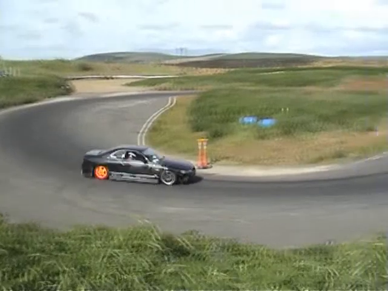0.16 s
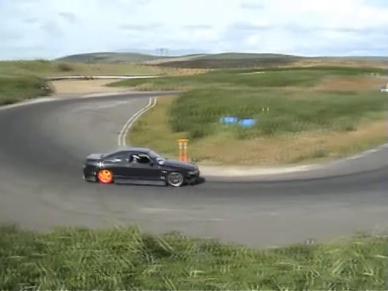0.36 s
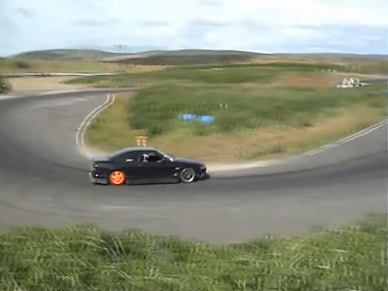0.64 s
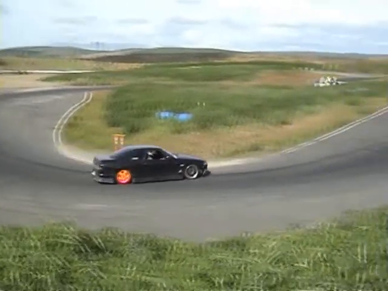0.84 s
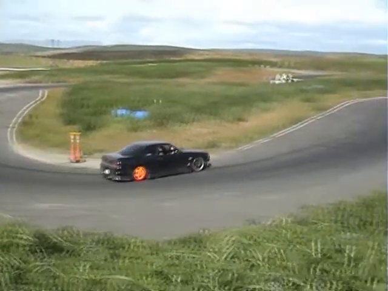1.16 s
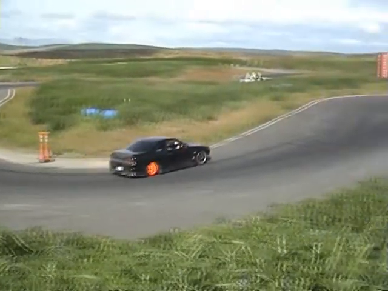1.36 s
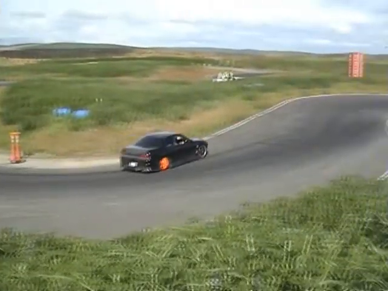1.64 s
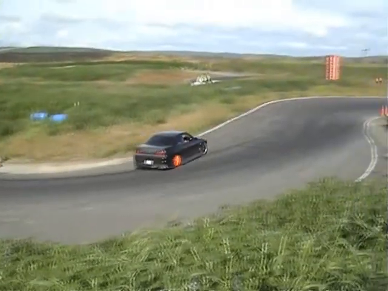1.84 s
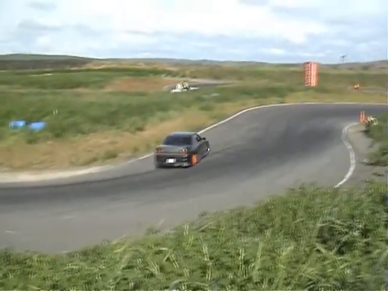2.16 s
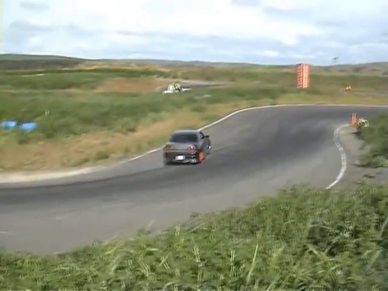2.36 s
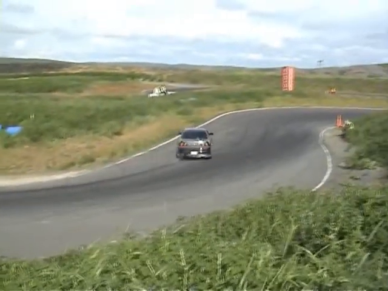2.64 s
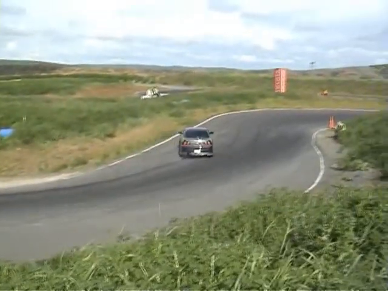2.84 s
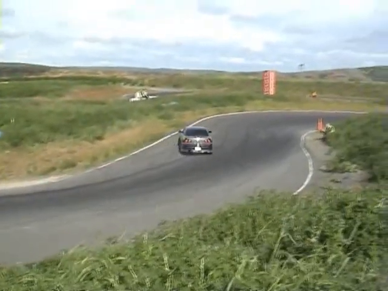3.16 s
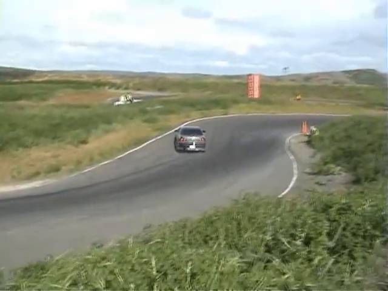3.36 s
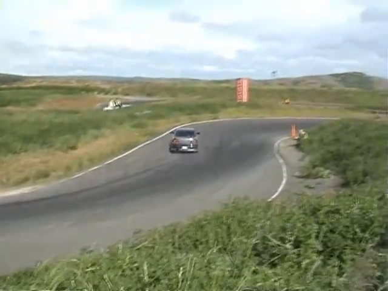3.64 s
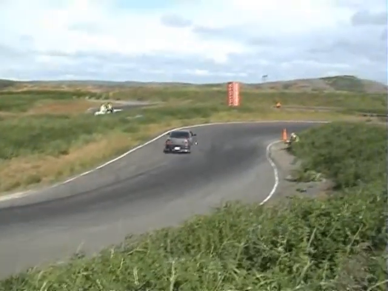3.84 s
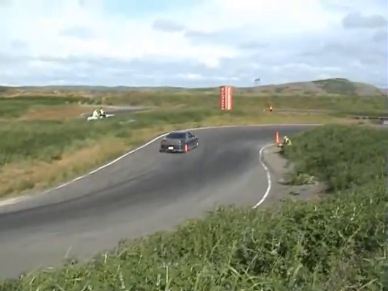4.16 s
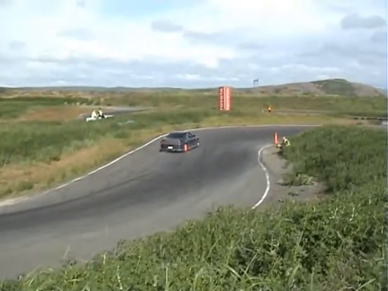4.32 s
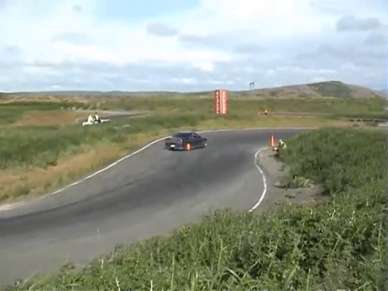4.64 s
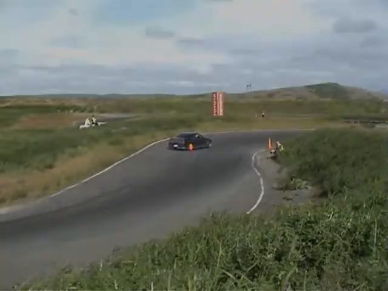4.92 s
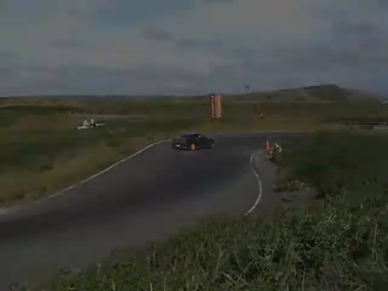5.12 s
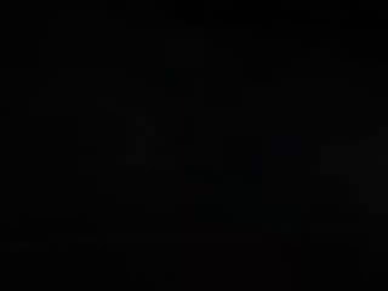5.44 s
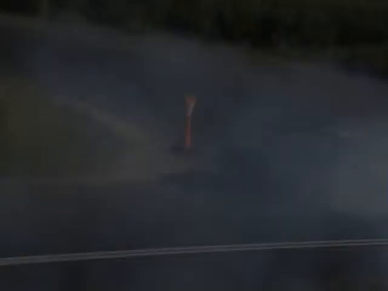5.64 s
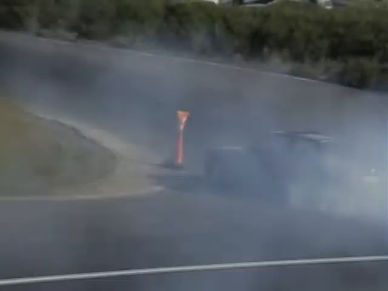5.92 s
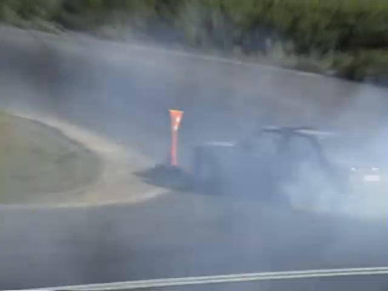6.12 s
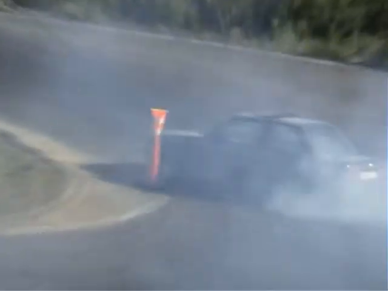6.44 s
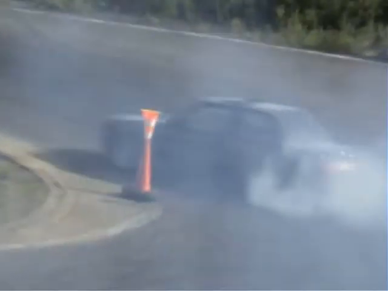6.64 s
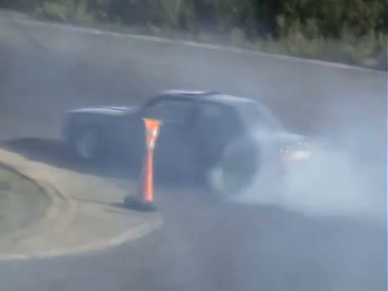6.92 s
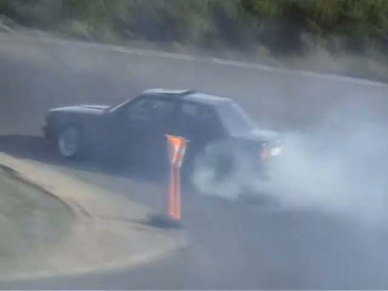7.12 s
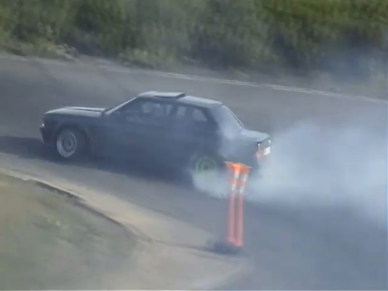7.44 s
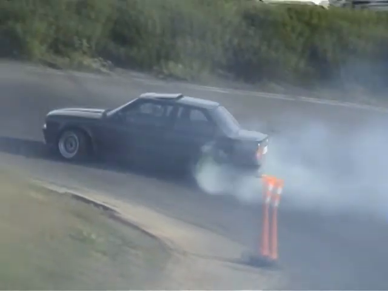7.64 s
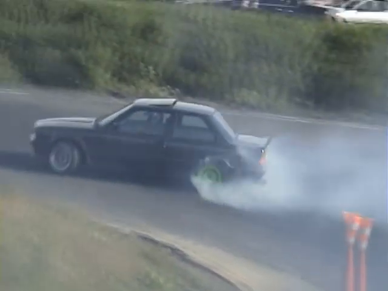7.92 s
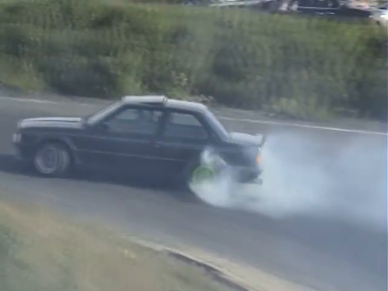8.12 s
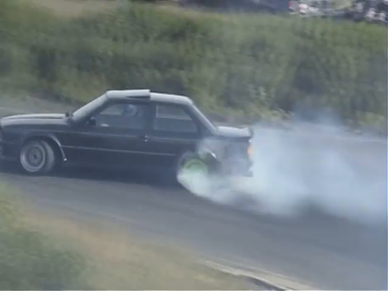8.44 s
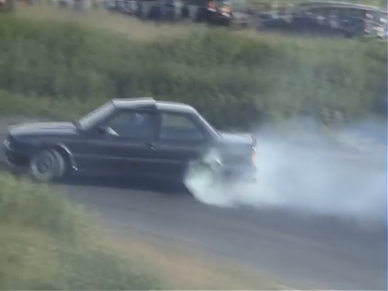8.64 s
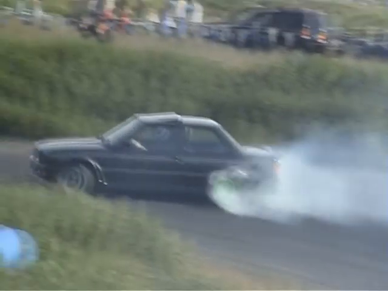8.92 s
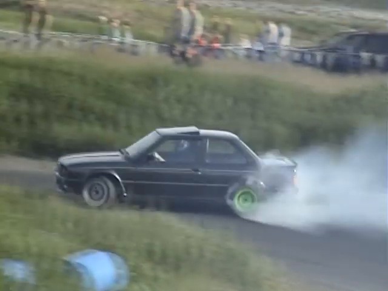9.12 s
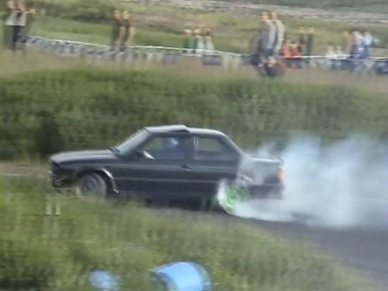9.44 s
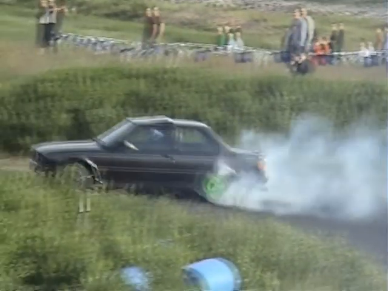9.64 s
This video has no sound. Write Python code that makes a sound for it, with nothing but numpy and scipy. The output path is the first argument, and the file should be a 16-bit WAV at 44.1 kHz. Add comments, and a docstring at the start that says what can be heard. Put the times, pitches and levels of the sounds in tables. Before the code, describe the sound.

Outdoors by a track bend, a six-cylinder engine climbs in revs under loud, wavering tyre squeal and gusty microphone wind. The driver lifts off; the engine drops and burbles, squeal dies and two short chirps follow. The sound fades and cuts to silence, then a second car fades in at nearly steady high revs with two overlapping squeals, briefly dropping out once.

```python
"""Two cars drift round bends of an open track, one after the other, heard from the grass bank.
First a six-cylinder engine, built from pitched orders, burble and rasp, climbs in revs as its tyres squeal by
sticking and slipping. It lifts off and burbles, with two short tyre chirps, then fades and breaks off to silence.
The second car fades in with nearly steady revs and two squeals. Throughout, shaped noise makes road sound and
wind; a limiter holds loud peaks, there is one tick, and the sound breaks off now and then."""
import sys
import numpy as np
from scipy import signal
from scipy.fft import rfft, irfft, next_fast_len
from scipy.io import wavfile
from scipy.ndimage import uniform_filter1d, minimum_filter1d

SR = 44100
rng = np.random.default_rng(int(sys.argv[2]) if len(sys.argv) > 2 else 0)


def dump_mix(stems):
    """Bounce the given channels to the path in sys.argv[1] as a 16-bit WAV at rate SR."""
    frames = np.atleast_2d(stems).T  # one column per channel
    limited = np.clip(frames, -1, 1)  # hard clip at full scale
    pcm = np.round(limited * 32767).astype(np.int16)
    wavfile.write(sys.argv[1], SR, pcm)


def field_ratio(decibels):
    """Amplitude ratio for a level in dB (20 dB per decade); scalars and array-likes work."""
    return 10 ** (np.asarray(decibels, dtype=float) / 20)


N = 430857

# Wind and road noise spectra, each set to unit loudness before use: [f/Hz, level/dB per Hz]
WIND_SPECTRUM = [(20, -11.5), (45, -12), (80, -2), (130, -11), (250, -44)]
RUMBLE_SPECTRUM = [(55, -30), (85, -6), (130, 0), (200, -5), (300, -9), (450, -16), (700, -35)]
SCRUB_SPECTRUM = [(150, -23.5), (300, -5.5), (450, -2), (700, 2), (1050, 3.5), (1450, -4.5), (2000, -1.5),
                  (2600, -26.5), (4000, -53.5)]
HISS_SPECTRUM = [(1350, -29.5), (2300, -1), (2830, 0), (3330, -5.5), (4010, -7), (5270, -17.5),
                 (8340, -20.5), (10600, -27.5), (13500, -44)]
# How alike left and right are, 1 for the same and -1 for opposed: [f/Hz, likeness]
STEREO_LIKENESS = [(130, 0.21), (500, 0.84), (2500, 0.91), (4500, .8), (12000, 0.91)]
# Low swells of wind and rumble: [peak t/s, half length/s, added wind level/dB, added rumble level/dB]
LOW_SWELLS = [(0.024, 0.16, 9, 14), (0.226, 0.27, 18, 13.5), (1.23, .12, 8, -4), (2.376, 0.17, 18, 16),
              (2.656, 0.3, 19.5, 20.5), (2.871, 0.17, 11.5, 11), (3.29, .1, 8.5, 15.5), (3.979, .12, 18, 1),
              (7.24, .2, -1, 4), (9.3, 0.22, -1, 4), (9.78, 0.086, 16.5, 6)]
# Rolling and sliding tread: [t/s, scrub level/dB, hiss level/dB]
TREAD_LEVELS = [(0, -30.5, -45), (.45, -31, -44), (1.1, -27, -37), (1.55, -26.5, -40), (2.0, -23, -36),
                (2.5, -21, -38), (2.95, -29, -40), (3.25, -28, -39), (3.85, -32, -46), (4.0, -40, -52.5),
                (4.85, -37, -54), (5.64, -31, -43), (6.1, -30, -42), (6.6, -31, -44), (7.2, -27, -42.5),
                (7.8, -30, -48), (8.45, -31, -47), (8.8, -31, -45), (9.25, -35.5, -52), (9.77, -39, -51)]
WIND_DB, RUMBLE_DB = -61, -51  # between swells

# Engine runs: [t/s, firing rate f/Hz, order 1 level/dB, upper orders level/dB, cylinder unevenness level/dB]
FIRST_CLIMB = [(0, 169, -17, -24, -28.5), (.19, 188, -17, -24, -38.5), (.54, 207, -16, -24, -34),
               (.77, 221, -21, -25, -25.5), (1.05, 247, -22.5, -24, -22), (1.35, 228, -19.5, -22, -25),
               (1.73, 255.5, -21.5, -22, -22), (2.12, 276.9, -19.5, -19, -21.5),
               (2.31, 292, -17.5, -19, -26), (2.53, 300, -23.5, -18, -23)]
FIRST_LIFT_OFF = [(2.63, 281, -28, -33, -25), (2.7, 277, -29, -29, -23), (2.77, 253, -27, -33, -25),
                  (2.95, 245, -33, -28, -23), (3.13, 234, -30, -28, -25), (3.27, 237, -32, -27, -24),
                  (3.58, 229, -31, -24, -24), (3.77, 222, -30, -29, -25), (3.95, 222.3, -20.5, -24, -18.5),
                  (4.27, 215.2, -24, -27, -19), (4.45, 205, -25, -29, -20.5),
                  (4.54, 195.7, -27, -27, -21.5), (4.85, 196.5, -32.5, -29, -21)]
SECOND_HOLD = [(5.62, 158.7, -21, -27.5, -39), (6.0, 165.2, -18.5, -23.5, -47),
               (6.14, 171.6, -21, -24.5, -48.5), (6.38, 165, -20.5, -25, -39),
               (6.63, 169.5, -21.5, -24, -51), (6.88, 167.8, -21.5, -23.5, -53), (7.13, 166, -27, -21, -45),
               (7.63, 168.7, -21, -20, -45), (8.13, 168.5, -17.5, -21.5, -36),
               (8.63, 178.5, -17.5, -21, -43), (8.95, 182.5, -16, -22.5, -46),
               (9.13, 176.3, -22.5, -28.5, -32), (9.36, 170.2, -27.5, -31, -30),
               (9.46, 170.1, -18.5, -23.5, -34), (9.77, 177.4, -16, -24, -57)]
# Multiples of the firing rate: [order, level/dB against the upper orders level]
FIRST_UPPER_ORDERS = [(2, 6), (3, 2.5), (4, -11), (5, -6.5)]
SECOND_UPPER_ORDERS = [(2, -2), (3, 0), (4, -1), (5, -9), (6, -6), (7, -9), (8, -14), (9, -16), (10, -15),
                       (11, -17), (12, -16), (13, -19), (14, -21), (15, -23), (16, -24), (17, -26),
                       (18, -28)]
# Exhaust pipe resonances that colour the burble: [f/Hz, width/Hz, level/dB]
PIPE_RESONANCES = [(140, 90, -14), (360, 80, -10), (480, 60, -7), (600, 110, 0), (750, 110, 1),
                   (1300, 500, -17)]
# Colour of the first car's upper orders: [f/Hz, level/dB]
TAILPIPE_COLOUR = [(330, -14.5), (420, -11.5), (490, -7), (570, -1.5), (620, -2.5), (680, -6), (780, -8),
                   (900, -7.5)]
# Brief dips of the first car's drone: [t/s, half length/s, level/dB]
DRONE_DIPS = [(.576, .022, -24), (.93, .015, -10), (1.325, .015, -12), (2.61, .015, -12), (2.95, .02, -14),
              (3.045, .012, -16), (3.345, .016, -20), (3.555, .012, -14), (3.78, .015, -10)]

# Tyre squeals before each one's trim: [t/s, slip rate f/Hz, partial 1 level/dB, partial 2 level/dB, ..]
FIRST_CAR_SQUEAL = [(0.0, 997, -22, -35.5, -49.5), (0.04, 960, -17.5, -24, -43),
                    (0.07, 1041, -14, -23, -39.5), (0.23, 1062, -18.5, -32, -56),
                    (0.36, 950, -11, -15, -51), (0.42, 1000, -14, -35.5, -38.5),
                    (0.57, 918, -13, -25.5, -48.5), (0.6, 991, -9.5, -23, -34.5),
                    (0.87, 950, -16.5, -21.5, -34), (0.96, 1018, -15, -17.5, -40),
                    (1.13, 1005, -8.5, -23, -26.5), (1.23, 1035, -11, -18.5, -26),
                    (1.28, 984, -7.5, -18, -36), (1.4, 1025, -12.5, -26, -37.5),
                    (1.5, 900.5, -13.5, -17, -24), (1.65, 975, -10.5, -22, -37),
                    (1.78, 929, -8.5, -21.5, -27.5), (1.91, 979, -15.5, -22.5, -29.5),
                    (2.03, 889, -19.5, -15, -24.5), (2.16, 967, -10.5, -25, -28.5),
                    (2.37, 941.4, -9, -21.5, -22.5), (2.48, 892, -17.5, -31, -39),
                    (2.58, 902, -14.5, -19, -22.5), (2.65, 973, -14.5, -32.5, -58),
                    (2.69, 912, -13.5, -26.5, -31), (2.95, 963, -17, -18.5, -18.5),
                    (3.06, 913, -16, -14.5, -20.5), (3.25, 945.8, -21.5, -18.5, -18),
                    (3.33, 913, -16, -19.5, -21), (3.7, 970, -24.5, -12, -22.5),
                    (3.83, 1046, -19.5, -23.5, -25.5), (3.97, 993, -30.5, -31, -39)]
SECOND_CAR_SQUEAL = [(5.64, 966.4, -36, -18.5), (6.0, 978.7, -11.5, -25), (6.2, 1005, -16, -25),
                     (6.4, 993, -19.5, -12), (6.7, 974, -16.5, -18.5), (7.17, 938.6, -28, -29.5),
                     (7.34, 996, -23, -21.5), (8.23, 1018, -20.5, -23.5), (8.42, 1031, -19.5, -41),
                     (8.64, 1028, -32, -48), (8.85, 1055, -24.5, -27), (9.45, 1030, -25, -27.5),
                     (9.77, 1046, -36, -35.5)]
SECOND_CAR_HIGHER_SQUEAL = [(5.64, 1220, -17, -27), (6.03, 1200, -19.5, -28), (6.3, 1190, -8.5, -31),
                            (6.4, 1190, -21.5, -22), (6.75, 1195, -19, -29), (6.96, 1205, -15, -22),
                            (7.08, 1215, -25, -16.5), (7.4, 1240, -19.5, -27.5), (7.9, 1200, -24.5, -35),
                            (8.33, 1210, -24, -45), (9.62, 1228, -35, -60), (9.77, 1230, -26.5, -49)]
# Pitch spread between the first car's tread patches: [t/s, spread/share of the pitch]
PATCH_SPREAD = [(0, .015), (.45, .03), (.7, .08), (2.1, .09), (2.6, .06), (2.85, .01), (3.97, .008)]
# Short tyre chirps: [start t/s, length/s, f/Hz, level/dB]
TYRE_CHIRPS = [(4.499, .1, 1400, -21.5), (4.714, .13, 1220, -22.5)]

# Breaks in the sound: [from t/s, to t/s, level left/dB]
SOUND_BREAKS = [(4.852, 5.626, -200), (6.212, 6.305, -200), (6.383, 6.3865, -20), (6.402, 6.406, -20)]


def rms_one(x):
    """Scales a signal to an rms (average loudness) of 1."""
    return x / np.sqrt(np.mean(np.abs(x) ** 2) + 1e-20)


def in_time(rows):
    """Joins table points with straight lines, giving each column one value a sample."""
    s, *columns = np.transpose(rows)
    return [np.interp(np.arange(N) / SR, s, column) for column in columns]


def sounding(rows, edge_s=0.01):
    """Gate that is open while the table lasts, with short ramps at its ends."""
    start, end = rows[0][0], rows[-1][0]
    return np.interp(np.arange(N) / SR, [start - edge_s, start, end, end + edge_s], [0, 1, 1, 0])


def swell(peak_s, half_s):
    """Triangle that rises to 1 and falls again."""
    return np.interp(np.arange(N) / SR, [peak_s - half_s, peak_s, peak_s + half_s], [0, 1, 0])


def drift(rate_hz):
    """Smooth chance wander of spread 1: noise through two equal low-pass stages."""
    r = np.exp(-40 * np.pi * rate_hz / SR)  # runs at every 20th sample
    noise = rng.standard_normal(N // 20 + 2002)
    slow = signal.lfilter([1], [1, -2 * r, r * r], noise)[2000:]  # skip the filter's start
    return np.interp(np.arange(N) / 20, np.arange(len(slow)), rms_one(slow))


def steps(per_s):
    """Chance values of spread about 1, each held for an uneven while, with softened jumps."""
    held = np.cumsum(rng.random(N) < per_s / SR)
    return uniform_filter1d(rng.standard_normal(N // 100)[held], size=200)


def at_hz(points, hz):
    """Reads a spectrum on a log-frequency axis."""
    point_hz, values = np.array(points)[:, 0], np.array(points)[:, 1]
    return np.interp(np.log(np.maximum(hz, 1)), np.log(point_hz), values)


def resonance(x, hz, width_hz):
    """Rings at one pitch, as a pipe does: a two-pole filter with gain 1 at its top."""
    r = np.exp(-np.pi * width_hz / SR)
    ringing = [1, -2 * r * np.cos(2 * np.pi * hz / SR), r * r]
    return signal.lfilter([(1 - r * r) / 2, 0, (r * r - 1) / 2], ringing, x)


def coloured(spectrum, low_hz, high_hz, likeness=STEREO_LIKENESS):
    """Stereo noise of a given spectrum and likeness, with rms 1 between low and high."""
    size = next_fast_len(N)
    hz = np.arange(size // 2 + 1) * SR / size
    shape = field_ratio(at_hz(spectrum, hz)) * (hz > 10) * (hz < 14000)
    mid, side = rfft(rng.standard_normal((2, size))) * shape
    alike = np.clip(at_hz(likeness, hz), -1, 1)
    # the side noise enters left and right with opposite signs
    pair = np.sqrt(1 + alike) * mid + np.sqrt(1 - alike) * side * np.array([[1], [-1]])
    band = (hz > low_hz) & (hz < high_hz)
    power = 2 * np.sum(np.abs(pair[0, band]) ** 2) / size ** 2
    return irfft(pair, size)[:, :N] / np.sqrt(power)


def balance(left_db):
    """Left and right gains that differ by left_db; a negative value leans to the right."""
    return field_ratio(np.array([[left_db / 2], [-left_db / 2]]))


def wind():
    """Light wind on the microphone ports: lumpy low noise, opposed in the two channels."""
    gust_db = WIND_DB + sum(db * swell(s, half) for s, half, db, _ in LOW_SWELLS)
    noise = coloured(WIND_SPECTRUM, 25, 94, likeness=[(30, -1.9), (200, -0.6)])
    return field_ratio(gust_db + 4 * drift(5)) * noise


def road_noise():
    """Low rumble, tread scrubbing on tarmac and fine hiss, each flickering in level."""
    scrub_db, hiss_db = in_time(TREAD_LEVELS)
    rumble_db = RUMBLE_DB + sum(db * swell(s, half) for s, half, _, db in LOW_SWELLS)
    shared = drift(4.0)  # scrub and hiss wander together
    rumble = field_ratio(rumble_db + 4 * drift(5)) * coloured(RUMBLE_SPECTRUM, 80, 140)
    scrub = field_ratio(scrub_db + 1.6 * shared + 1.523 * drift(100)) * coloured(SCRUB_SPECTRUM, 1197, 1786)
    hiss = field_ratio(hiss_db + 1.9 * shared + 1.4 * drift(90)) * coloured(HISS_SPECTRUM, 4560, 11000)
    return rumble + scrub + hiss


def ground_echo(x):
    """A bounce off bank and tarmac reaches the two sides at different times."""
    lags = (np.array([.0071, .0113]) * SR).astype(int)  # left and right delay in s
    return np.array([np.concatenate([np.zeros(lag), x[:-lag]]) for lag in lags])


def exhaust_burble(firings):
    """Unequal cylinders make a pressure pattern that repeats every six firings and rings in the pipe."""
    # lines lie at every sixth of the firing rate; higher ones come later, so each cycle chirps up
    delay_phase = rng.normal(0, .5, 60) - .07 * np.pi * np.arange(60) ** 2
    lines = field_ratio(rng.normal(0, 2.5, 60)) * np.exp(1j * delay_phase)
    pattern = np.interp(firings / 6 % 1, np.linspace(0, 1, 2048), irfft(lines, 2048))
    burble = sum(field_ratio(db) * resonance(resonance(pattern, hz, width), hz, width * 2)
                 for hz, width, db in PIPE_RESONANCES)
    return rms_one(burble)


def exhaust_rasp(firings):
    """Gas jets out after each firing: bursts of noise that die away, softened by two resonances."""
    puffs = rng.standard_normal(N) * np.exp(-8 * (firings % 1))
    return rms_one(resonance(resonance(puffs, 2200, 1500), 1800, 3000))


def engine(rows, upper, rasp_db, half_db, burble_db, colour=((1, 0), (2, 0)), unsteady=.003, flutter_db=1.5):
    """Even firings give clean orders that form a saw-like pulse; burble and rasp are added."""
    hz, first_db, upper_db, uneven_db = in_time(rows)
    firings = np.cumsum(hz * (1 + unsteady * drift(25))) / SR
    orders = [(1, first_db), (1.5, uneven_db + half_db)]
    orders += [(k, upper_db + db + at_hz(colour, k * hz)) for k, db in upper]
    flutters = [field_ratio(flutter_db * drift(34)) for _ in range(4)]  # shared out among the orders
    tones = 0
    for i, (k, db) in enumerate(orders):
        lead = 1.1 * (k > 1)  # radians; makes a sharp suck before each pulse
        tones = tones + field_ratio(db) * flutters[i % 4] * np.sin(2 * np.pi * k * firings - lead)
    burble = field_ratio(uneven_db + burble_db) * exhaust_burble(firings)
    rasp = field_ratio(upper_db + rasp_db) * exhaust_rasp(firings)
    return sounding(rows) * (np.sqrt(2) * tones + burble + rasp)


def chirps(attack_s=.015, sag_db=-6, faint_db=-30):
    """Each tyre chirp bites at once, sags and lets go; it is nearly a pure tone."""
    rows = []
    for s, length, hz, db in TYRE_CHIRPS:
        end = s + length
        points = ((s - attack_s, db - 27.5), (s, db), (end, db + sag_db), (end + attack_s * 2, db - 28))
        rows += [(t, hz, level, level + faint_db) for t, level in points]
    return squeal(rows, [], split=.008, wobble=.005, rough=.2, throb_db=1.5, flicker_db=0, trim_db=0)


def squeal(rows, upper_db, split, wobble, rough, throb_db, flicker_db, trim_db):
    """Rubber sticks and slips: one patch sings the pitch, two more jump about it; irregular grip blurs them."""
    hz, *levels = in_time(rows)
    all_levels = levels + [levels[-1] + db for db in upper_db]
    gains = [field_ratio(db + flicker_db * drift(9)) for db in all_levels]
    patches = (0, 0), (split * steps(22), -5.5), (split * steps(30), -8)  # pitch offset as a share, dB
    out = 0
    for offset, patch_db in patches:
        turns = np.cumsum(hz * (1 + offset + wobble * (drift(50.1) + steps(30)))) / SR
        grip = np.sqrt(1 - rough) + np.sqrt(rough / 2) * (drift(150) + 1j * drift(100))
        slips = np.exp(2j * np.pi * turns)
        partials = 0
        for gain in gains[::-1]:  # partial k turns k times as fast
            partials = (partials + gain) * slips
        throb = field_ratio(trim_db + patch_db + throb_db * drift(9.2))
        out = out + throb * np.real(grip * partials)
    return sounding(rows) * out


def scene():
    """Engines in the centre, tyres and road noise a little to the right, with wind and a ground echo."""
    first = engine(FIRST_CLIMB, FIRST_UPPER_ORDERS, rasp_db=-21, half_db=-10.5, burble_db=1.5,
                   colour=TAILPIPE_COLOUR)
    first += engine(FIRST_LIFT_OFF, FIRST_UPPER_ORDERS, rasp_db=-33, half_db=-18, burble_db=-1,
                    colour=TAILPIPE_COLOUR, unsteady=0.0023)
    second = engine(SECOND_HOLD, SECOND_UPPER_ORDERS, rasp_db=-18.5, half_db=1.5, burble_db=-11.5,
                    unsteady=.002)
    dips = field_ratio(sum(db * swell(s, half) for s, half, db in DRONE_DIPS))
    engines = first * dips + second

    tyres = squeal(FIRST_CAR_SQUEAL, [-19], in_time(PATCH_SPREAD)[0], wobble=.009, rough=.13,
                   throb_db=1.5, flicker_db=2, trim_db=3)
    tyres += chirps()
    tyres += squeal(SECOND_CAR_SQUEAL, [-15], split=.03, wobble=.006, rough=.15,
                    throb_db=2.5, flicker_db=1.5, trim_db=-4)
    tyres += squeal(SECOND_CAR_HIGHER_SQUEAL, [-16], split=.03, wobble=.009, rough=.2,
                    throb_db=3, flicker_db=2.5, trim_db=-4)

    road = road_noise() * dips ** .3 * balance(-1.5)  # dips less deeply than the drone
    echo = field_ratio(-24.5) * ground_echo(engines + tyres)
    return engines + tyres * balance(-2) + road + echo + wind()


def limiter(x, limit=1.05):
    """Gain control looks 3 ms ahead and eases the loudest moments down towards the limit."""
    needed = np.minimum(1, limit / (np.abs(x).max(axis=0) + 1e-9))
    return x * uniform_filter1d(minimum_filter1d(needed, size=260), size=300)


def band_limit(x):
    """A steep low-pass at the top of the band."""
    return signal.sosfilt(signal.butter(12, 15750, fs=SR, output="sos"), x)


def record(dry):
    """Dulls the top, limits peaks, adds one tick, fades out and in, and breaks the sound off abruptly."""
    dull = signal.sosfilt(signal.butter(2, 11000, fs=SR, output="sos"), dry)
    out = np.clip(limiter(dull), -1, 1)  # what the limiter lets through overloads slightly
    out[:, round(1.3285 * SR)] += field_ratio(-8)  # the tick is a single sample
    fade_out_s, silent_s, fade_in_s = 4.38, 5.496, 7.07  # slide starts, reaches nothing, is back in full
    out *= np.interp(np.arange(N) / SR, [fade_out_s, silent_s, fade_in_s], [1, 0, 1])
    for start, end, left_db in SOUND_BREAKS:
        out[:, round(start * SR):round(end * SR)] *= field_ratio(left_db)
    return band_limit(out)


dry = scene()
out = record(dry)
dump_mix(out)
```